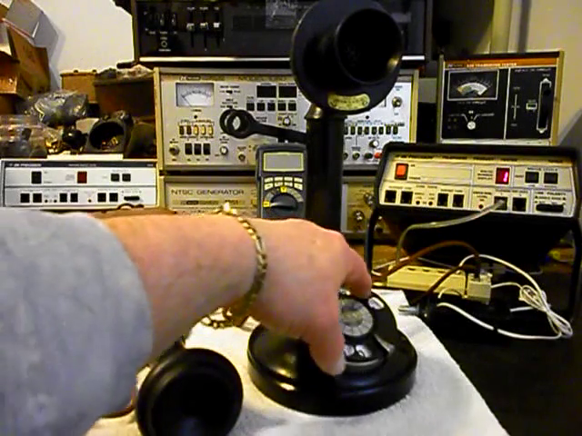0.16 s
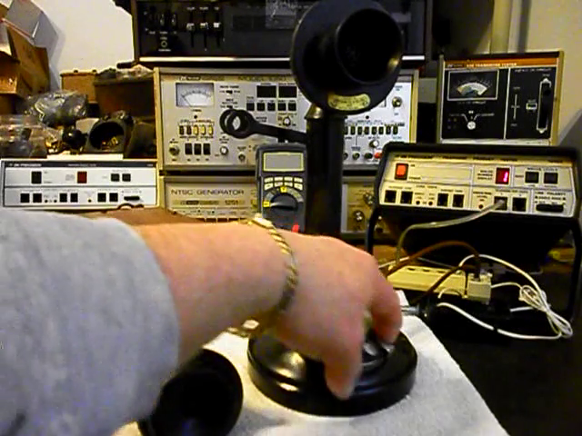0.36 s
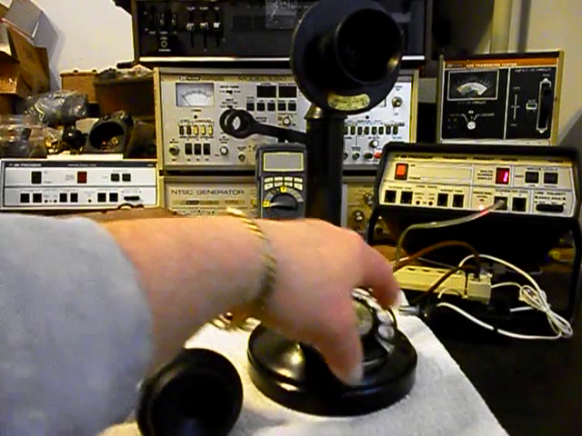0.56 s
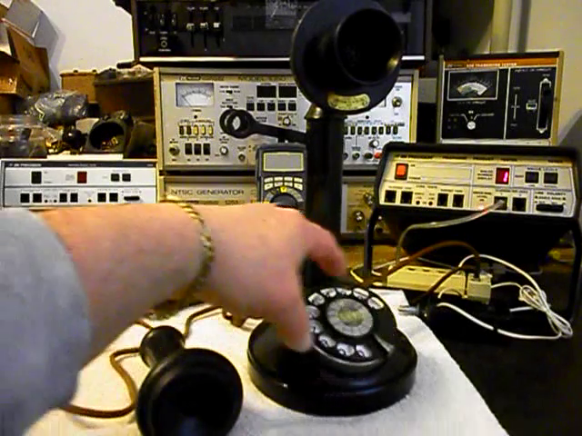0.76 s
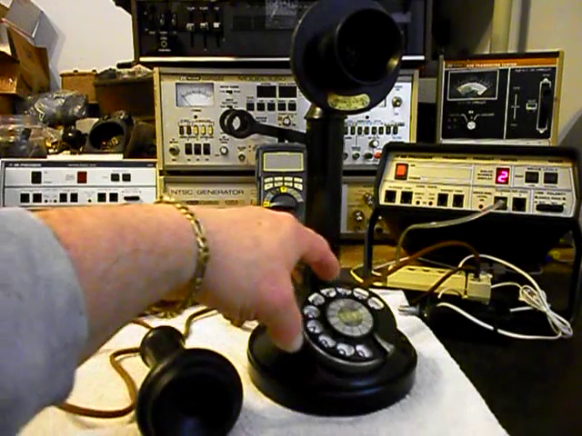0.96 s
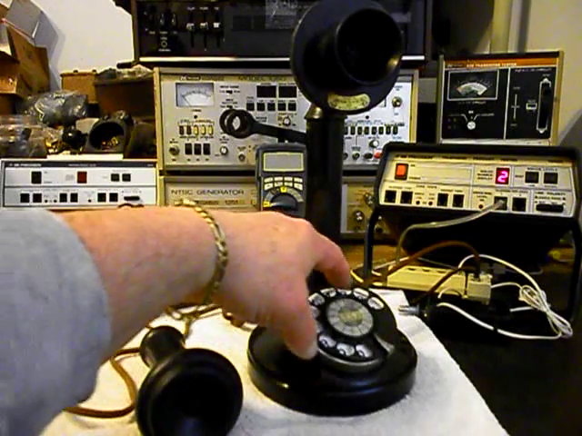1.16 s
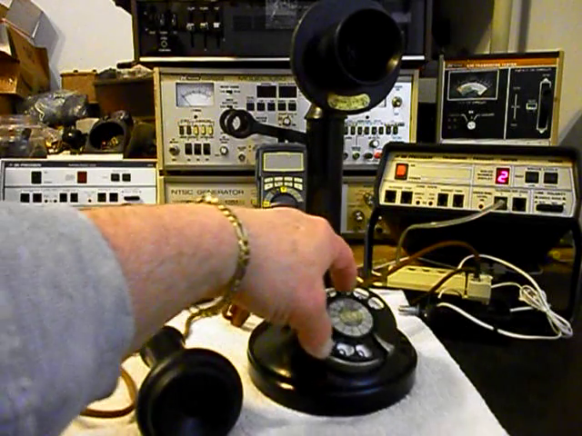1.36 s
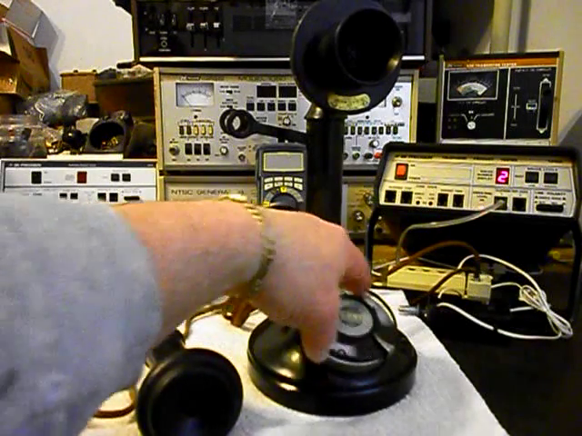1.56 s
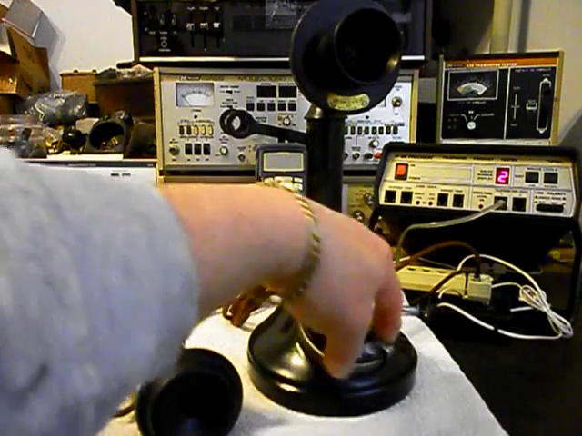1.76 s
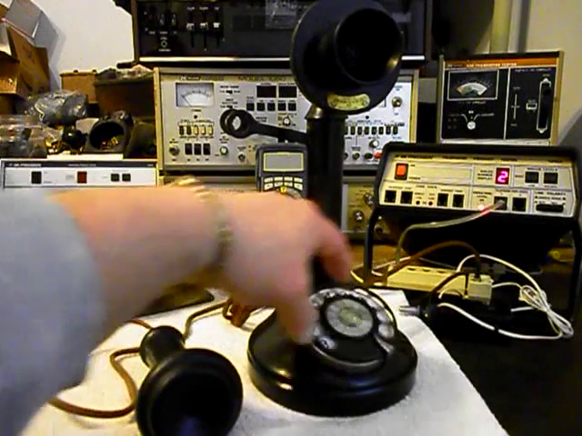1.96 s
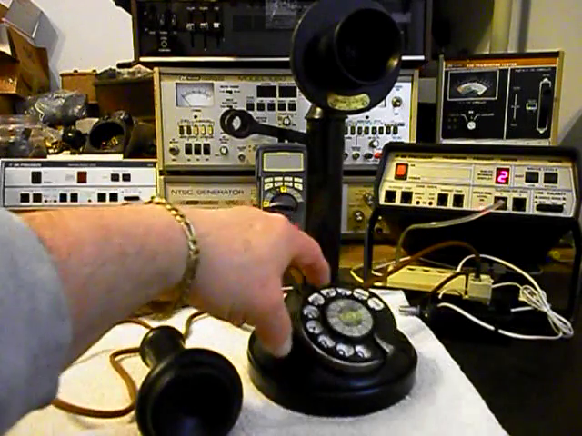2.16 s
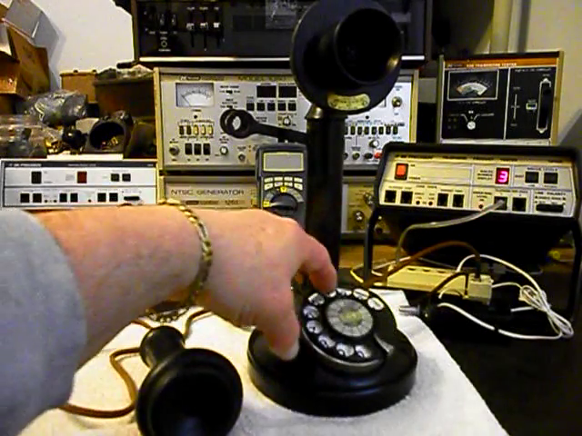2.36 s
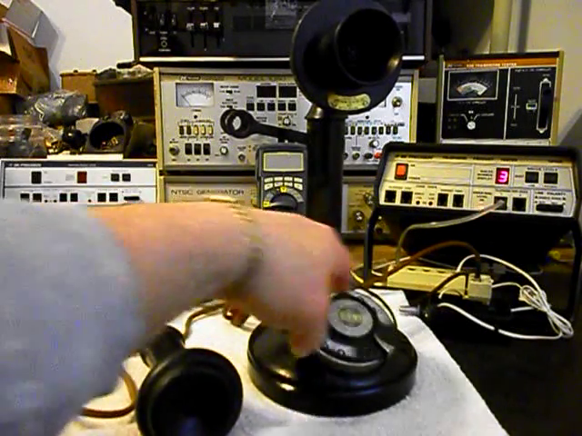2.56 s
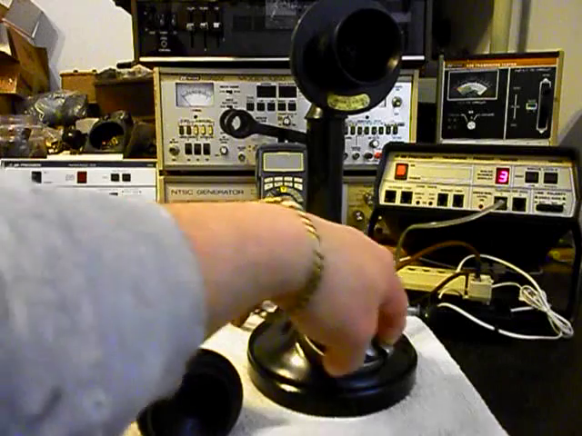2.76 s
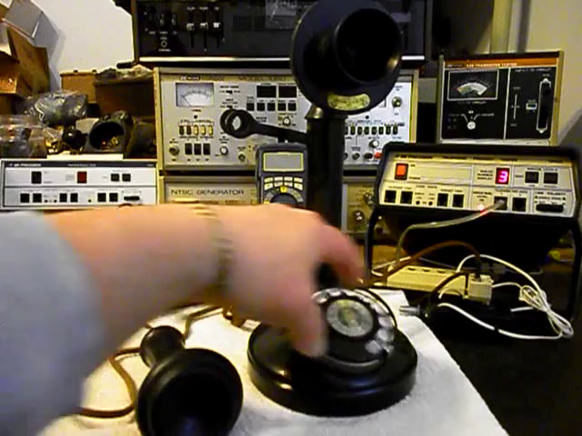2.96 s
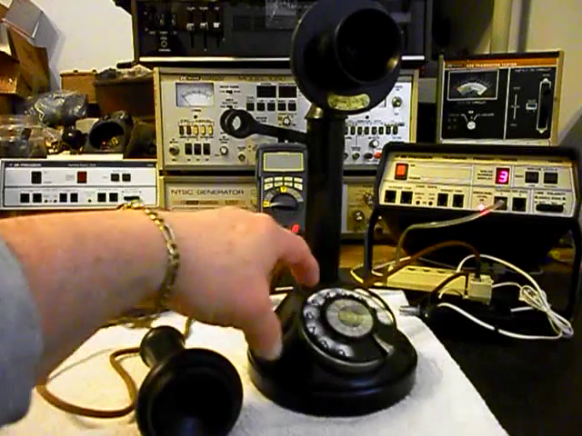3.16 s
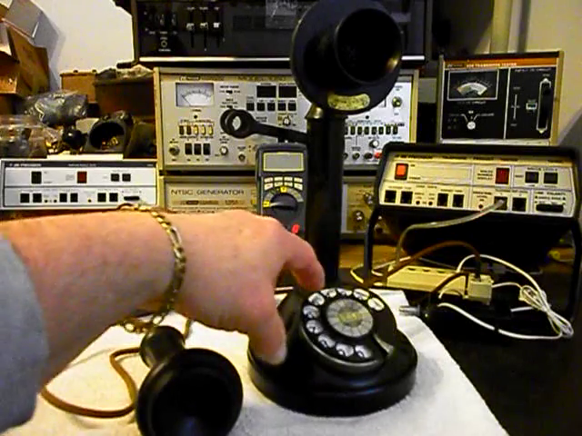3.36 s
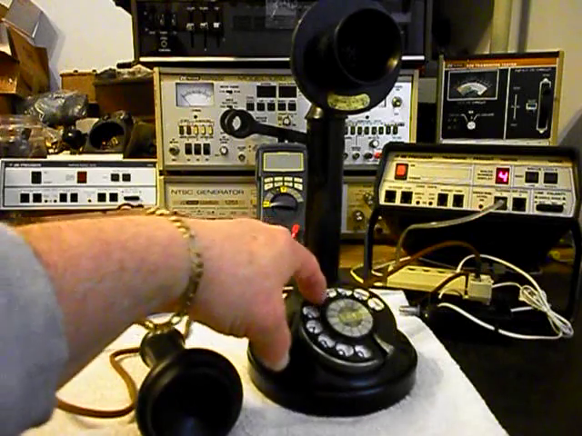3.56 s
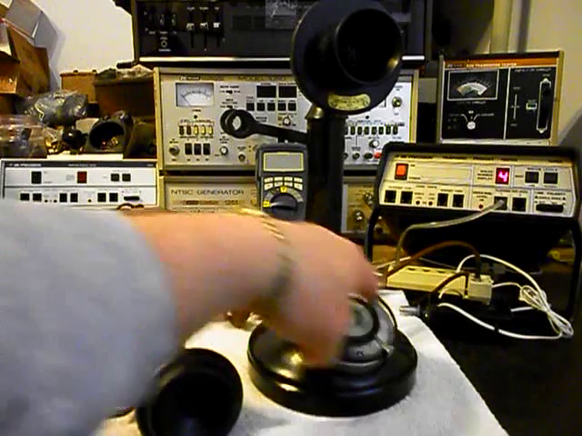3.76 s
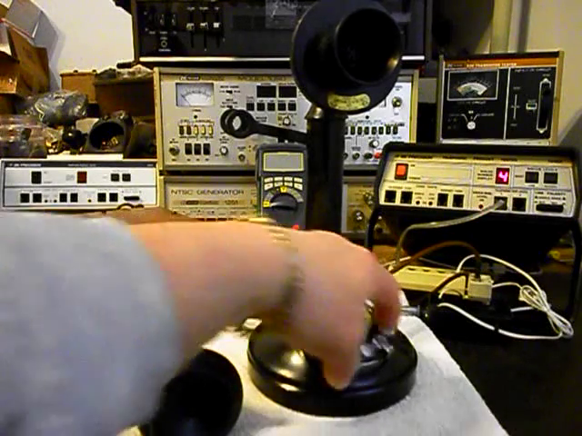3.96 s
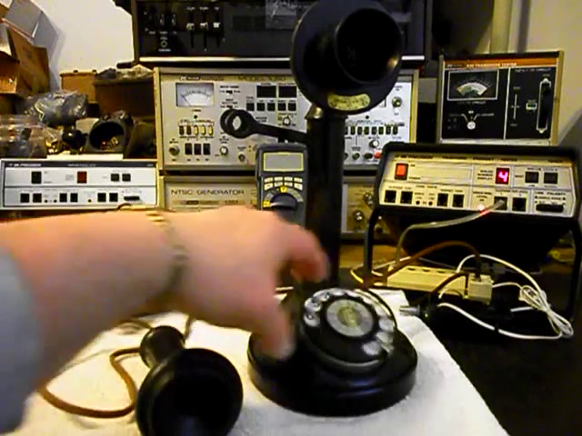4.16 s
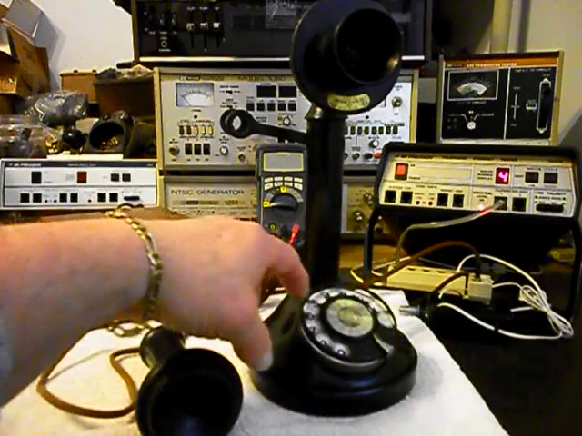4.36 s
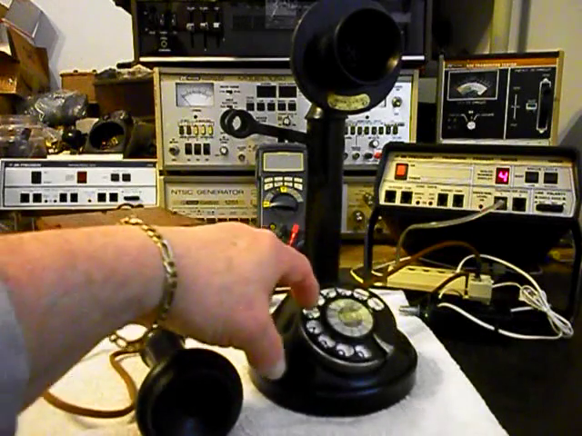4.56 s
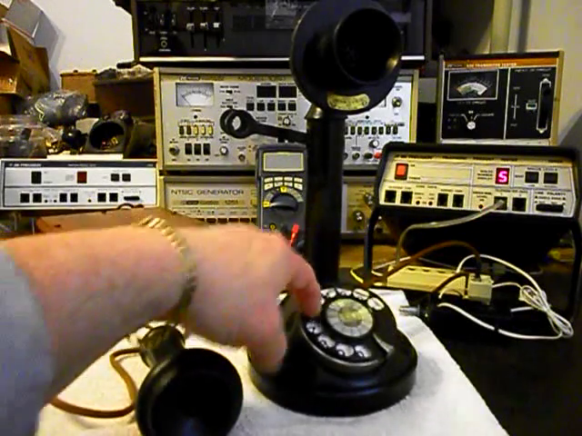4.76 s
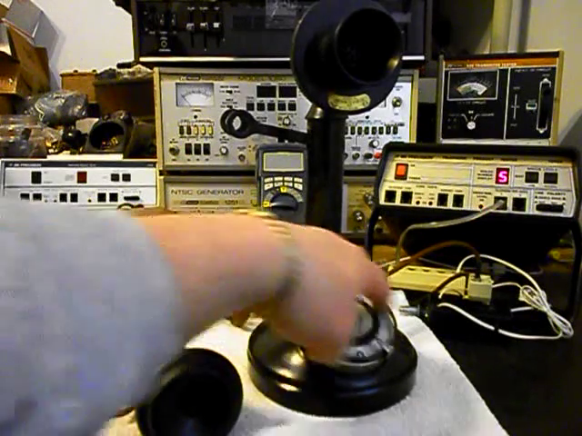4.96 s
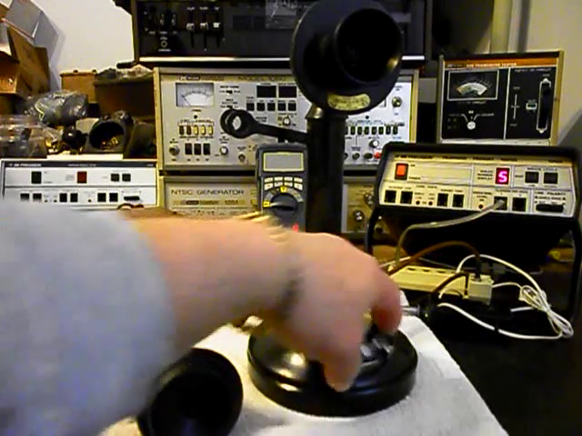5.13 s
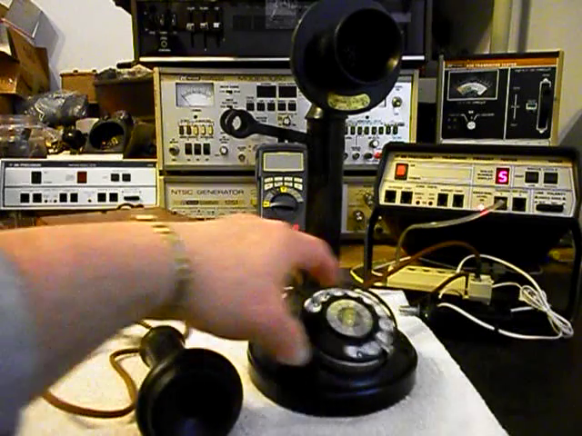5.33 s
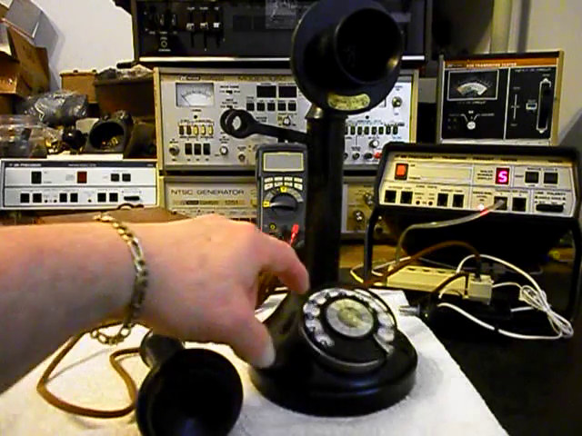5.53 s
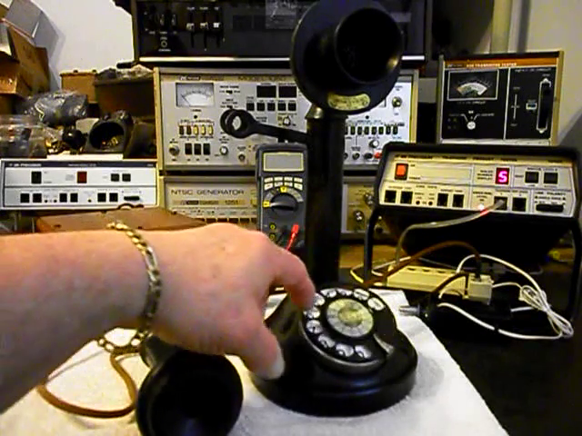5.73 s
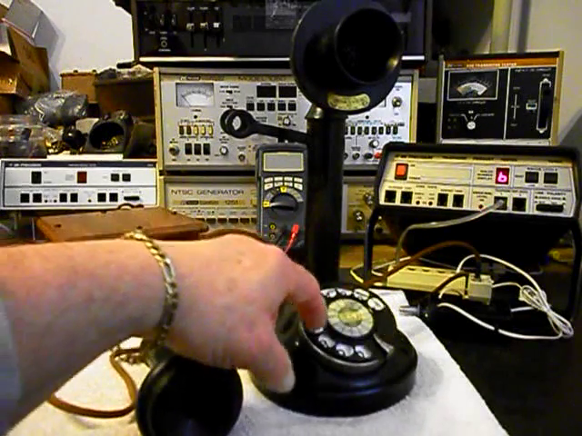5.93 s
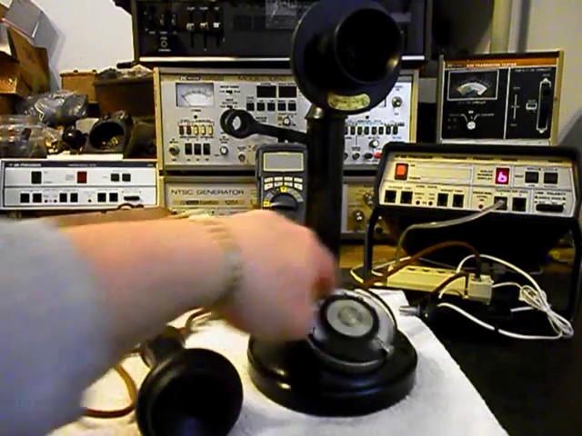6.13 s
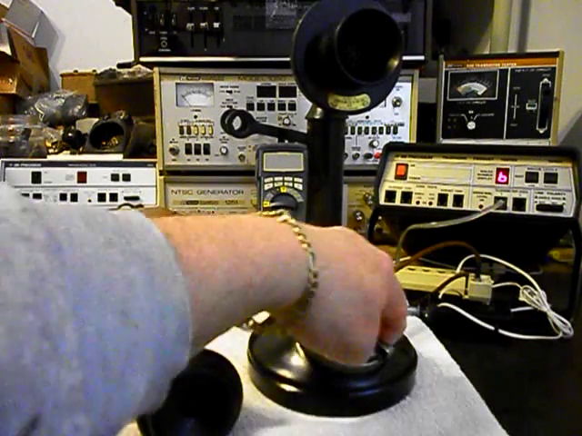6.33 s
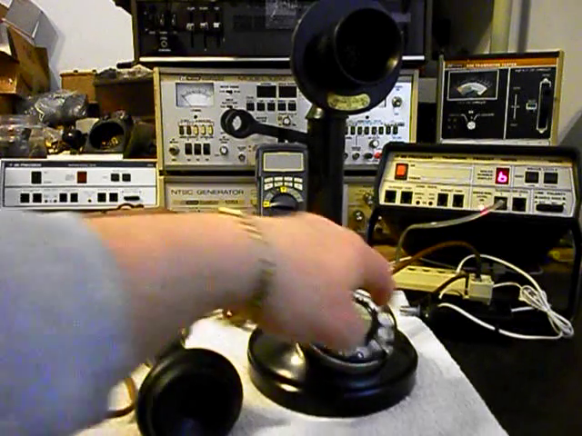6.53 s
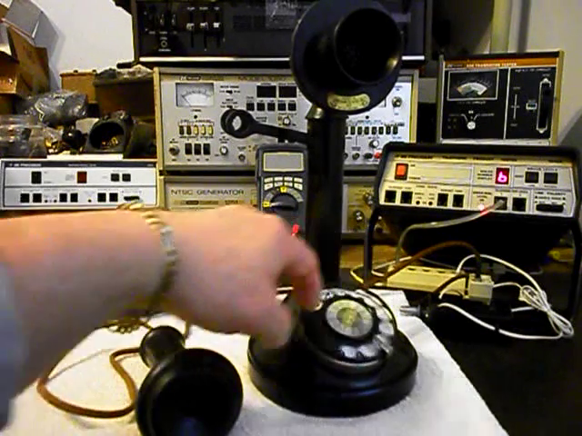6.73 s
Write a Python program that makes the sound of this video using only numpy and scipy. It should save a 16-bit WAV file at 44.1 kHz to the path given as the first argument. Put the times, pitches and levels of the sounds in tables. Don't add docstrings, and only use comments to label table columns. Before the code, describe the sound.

An old rotary telephone dial is wound six times with ratcheting clicks, each release clattering sharply and whirring back to a snappy stop.

```python
import sys
import numpy as np
from scipy import signal
from scipy.fft import rfft, irfft
from scipy.io import wavfile
from scipy.ndimage import uniform_filter1d

SR = 44100
rng = np.random.default_rng(int(sys.argv[2]) if len(sys.argv) > 2 else 0)


def generate_wav(signal):
    frames = np.transpose(np.atleast_2d(signal))
    scaled = np.clip(frames, -1, 1) * 32767
    pcm = np.round(scaled).astype(np.int16)
    wavfile.write(sys.argv[1], SR, pcm)


def invert_db(x):
    u = np.asarray(x, float) / 20
    return 10 ** u


N = 299439

# hz, level_db
AIR_COLOUR = [(12, -48.5), (25, -24.5), (45, -23), (81, -22.5), (109, -8), (144, -4), (175, -5.5),
              (344, -4), (1430, -13.5), (1830, -13.5), (4180, -18.5), (7800, -21.5), (10100, -75.5),
              (17200, -120)]
# hz, t60_s
ROOM_DECAY = [(200, 0.78), (1000, 0.37), (3000, 0.44), (7500, 0.31)]

# start_s, peak_db, pitch_hz, t60_s
KNOCKS = [(0.002, -47.5, 280, 0.047), (0.021, -42.5, 2960, 0.024), (0.21, -45, 1280, 0.035),
          (0.262, -48.5, 3000, 0.04), (0.255, -37.5, 1000, 0.031), (0.345, -27.5, 619, 0.062),
          (1.219, -18, 660, 0.011), (1.224, -46, 1080, 0.062), (1.232, -31.5, 670, 0.034),
          (1.248, -44, 478, 0.059), (1.328, -37, 723, 0.034), (1.452, -38.5, 663, 0.041),
          (2.436, -28.5, 640, 0.023), (2.677, -2.5, 656, 0.011), (3.254, -20.5, 857, 0.029),
          (3.464, -40, 667, 0.03), (3.573, -46.5, 770, 0.046), (3.809, -38.5, 560, 0.11),
          (4.475, -17, 1020, 0.021), (5.011, -24.5, 640, 0.032), (5.965, -27.5, 666, 0.026),
          (6.335, -18.5, 397, 0.028)]
# top_s, level_db, fade_db_per_s
RUBS = [(.16, -61.5, 39), (.23, -55.5, 199), (.35, -41, 299.5), (.455, -48.5, 299), (1.222, -51.5, 154),
        (1.34, -59.5, 63), (1.452, -59.5, 62.5), (2.402, -54.5, 295), (2.44, -56.5, 195),
        (2.522, -51.5, 296.5), (2.708, -38, 92.5), (3.472, -58, 899), (3.582, -56, 63.5), (3.65, -51, 301),
        (4.672, -55.5, 128), (4.797, -54.5, 54), (4.81, -48, 499), (5.015, -40.5, 299), (5.055, -48.5, 71),
        (5.966, -44.5, 450), (6.05, -57.5, 54.5), (6.34, -40.5, 243)]
# top_s, level_db
BENCH_SWAYS = [(.36, -56), (.81, -67), (1.23, -66), (1.78, -57), (1.911, -79.5), (2.191, -67), (2.459, -72),
               (2.7, -55), (2.86, -63), (3.33, -67), (3.48, -76), (3.8, -71.5), (3.95, -63), (4.54, -66),
               (4.73, -76), (5.03, -60.5), (5.24, -64), (5.82, -67.5), (5.98, -64), (6.33, -59.5),
               (6.56, -65), (6.79, -73)]
# start_s, peak_db
AIR_PUSHES = [
    (0.473, -53.5),
    (1.779, -49),
    (3.943, -45),
    (6.477, -56.5),
]
# start_s, length_s, from_hz, to_hz, level_db
SQUEAKS = [(.92, .06, 3100, 3400, -63), (.92, .05, 1550, 1600, -66), (3.618, .042, 3100, 3550, -59),
           (2.712, .042, 165, 172, -32), (2.702, .022, 580, 520, -41), (2.708, .02, 400, 330, -43),
           (2.728, .026, 330, 300, -40), (2.756, .028, 330, 290, -39), (2.722, .05, 720, 640, -39),
           (5.056, .044, 165, 170, -38), (5.046, .022, 520, 420, -47), (5.074, .028, 330, 290, -44),
           (5.104, .026, 290, 340, -43), (5.074, .025, 660, 650, -48), (1.495, .035, 650, 640, -60),
           (2.85, .27, 300, 290, -56), (3.24, .016, 330, 320, -45), (2.1265, .0065, 900, 1080, -21),
           (2.134, .012, 1050, 1150, -33), (5.712, .03, 1940, 2010, -31)]
# pitch_hz, width_hz, level_db
BASE_MODES = [(161, 64, -10), (290, 77, 4.5), (670, 37, -2), (1020, 280, -18)]

WHIR_DB = [-39.5, -38.5, -38, -37.5, -37.5, -38]
# hz, level_db
GEAR_COLOUR = [(59, -60.5), (100, -23), (480, -17), (642, -10.5), (1360, -11.5), (1950, -10), (2470, -13.5),
               (6870, -10.5), (7800, -17), (10100, -59), (17200, -120)]
# hz, level_db
PLATE_COLOUR = [(1000, -22), (1750, 3), (2350, 3.5), (3200, -31)]
# pitch_hz, width_hz, level_db
TRAIN_MODES = [(666, 730, -6), (1050, 300, -6), (2000, 190, 0), (2240, 200, -0.5), (3295, 390, -7.5),
               (5100, 150, -8), (7100, 180, -5)]
# start_s, peak_db
RINGING_TEETH = [(1.924, -33), (1.941, -35), (1.9699, -29), (2.0093, -28.5), (2.0991, -33), (2.1155, -27.5),
                 (2.1205, -32), (2.874, -31), (2.895, -33), (2.921, -36), (2.958, -30), (2.9857, -32),
                 (3.014, -37), (3.045, -36), (3.0707, -29), (3.084, -28), (3.0999, -26.5), (3.1188, -28),
                 (3.2246, -30), (4.0337, -26.5), (4.0811, -31), (4.0991, -40), (4.147, -31), (4.1664, -40),
                 (4.1754, -30), (4.2033, -31), (4.2213, -29), (4.2304, -27), (4.2602, -23.5), (4.2876, -28),
                 (4.3004, -31), (4.3164, -32), (4.336, -31), (4.3454, -29), (5.234, -29.5), (5.3268, -36),
                 (5.3467, -36), (5.3742, -30), (5.4026, -28), (5.43, -27), (5.4595, -26), (5.4736, -30),
                 (5.4864, -33), (5.5059, -22), (5.5174, -34), (5.5448, -28), (5.5638, -32), (5.5724, -30),
                 (5.5992, -27), (5.6191, -28), (6.5768, -33), (6.6129, -29), (6.6508, -28.5), (6.686, -31),
                 (6.7281, -31), (6.754, -35), (6.7635, -27)]
# pitch_hz, width_hz, level_db
PINION_MODES = [(1978, 71, -0.5), (2167, 190, -6.5), (1660, 100, -11.5)]
# start_s, peak_db
TIGHT_TICKS = [(0.022, -54), (1.2174, -43.5), (1.634, -18.5), (1.659, -29), (1.924, -30), (2.0108, -38),
               (2.099, -32), (2.9595, -25), (2.9858, -29), (3.0704, -28), (3.1188, -27), (3.225, -33),
               (4.147, -29), (4.1757, -30), (4.2016, -26.5), (4.2614, -28), (4.287, -26), (4.337, -26),
               (4.9685, -21.5), (5.3762, -27), (5.402, -25), (5.43, -26.5), (5.4577, -31), (5.504, -23),
               (5.5452, -27), (5.487, -33), (5.573, -24.5), (5.632, -33), (5.9646, -37.5), (6.2895, -21),
               (6.65, -27.5), (6.7623, -25.5)]

# start_s, peak_db, treble_db
LEAVE_SNAPS = [(0.293, -28, 0), (0.3053, -19, -14), (1.548, -15.5, -12.5), (1.5613, -16, -9),
               (2.547, -26, -1.5), (2.561, -17.5, -9), (3.6543, -16.5, -11), (3.671, -16, -15),
               (4.811, -17, -8), (4.82, -14, -18), (6.0963, -17.5, -10), (6.104, -16.5, -13)]
# start_s, peak_db, treble_db
HOME_SNAPS = [
    (0.6508, -4, -12.5),
    (2.041, -3, -15.5),
    (3.159, -2, -16),
    (4.377, -1, -14),
    (5.6593, -1.6, -14),
]
LEAVE_PITCH = [0.89, 0.88]
# pitch_hz, width_hz, level_db
SPRING_MODES = [(1617, 983, 12.5), (1930, 440, -1), (2730, 180, -17), (6760, 543, 13)]
# pitch_hz, width_hz, level_db
LEAF_MODES = [(1674, 150, 3), (2075, 970, 4)]

# start_s, peak_db, plate_db
CATCHES = [
    (0.3081, -15, -16),
    (1.5648, -16, -10),
    (2.5653, -15, -16.5),
    (3.6751, -14.5, -10.5),
    (4.8227, -13.5, -25),
    (6.107, -11.5, -18),
]
# start_s, peak_db, plate_db
RATCHETS = [(0.3274, -20, -10), (0.3412, -16.5, -8.5), (1.5947, -17, -9), (1.6184, -17.5, -9),
            (1.644, -16, -10), (2.6101, -18, -10), (2.6382, -18, -9), (2.6534, -16, -9.5),
            (2.6657, -16.5, -11), (3.712, -15, -13), (3.7407, -17.5, -10), (3.7633, -16.5, -12.5),
            (3.7815, -13, -16), (3.802, -17.5, -14.5), (4.8558, -16, -23), (4.888, -16, -19),
            (4.9209, -16.5, -19), (4.9468, -17.5, -29), (4.972, -19.5, -13), (4.999, -19, -15.5),
            (6.131, -17, -18), (6.1654, -13, -20), (6.1985, -14.5, -31), (6.2328, -13.5, -33),
            (6.27, -20.5, -11.5), (6.2958, -17.5, -14.5), (6.32, -18, -11.5)]
PULL_BASE_DB = [-6, -4.5, -4, -6, -6, -5]
PULL_RIM_DB = [-4.5, 0.5, -3, -1.2, 1, 1.5]
PULL_SPREAD_MS = [2.48, 2.5, 2.66, 2.4, 2.44, 2.4]
# hz, level_db
PAWL_COLOUR = [(88, -70), (150, -9.5), (940, -4.5), (1400, -8), (1880, -6.5), (3140, -13.5), (3530, -12.5),
               (7180, -11.5), (7800, -14), (10100, -39.5), (17200, -120)]
# pitch_hz, width_hz, level_db
RATCHET_MODES = [(668, 120, -6), (1030, 96, -3.5), (1633, 84, -5), (1910, 200, -0.5), (3020, 170, -2),
                 (2960, 140, -14.5), (3700, 170, -16), (4260, 180, -10), (4830, 160, -8.5),
                 (5370, 310, -15), (6330, 290, -5.5), (7290, 600, -2)]

# start_s, peak_db, touch_db, spread_ms, base_db
RELEASES = [
    (0.4728, 0, -13, 1.1, -11),
    (1.7778, 2.5, -13, 0.74, -2.5),
    (2.816, 0, -9, 1.53, -2),
    (3.9465, -2.5, -5.5, 2.26, -6),
    (5.1503, -0.5, -15, 1.5, -0.5),
    (6.482, -1.5, -7, 1.47, -1),
]
TOUCH_LEAD_MS = [4.7, 2.3, 2.7, 1.2, 2.2, 2.4]
RELEASE_RIM_DB = [3, -2, -6, 1, -5.5, -0.5]
# start_s, peak_db, plate_db, spread_ms
BOUNCES = [(.492, -8, -3, 4), (0.5048, -15, -7, 3.1), (1.801, -5.5, -10.5, 3.1), (1.816, -13.5, -3.5, 3.2),
           (1.827, -18, -2.5, 4.3), (2.8335, -10, 3, 2.1), (2.846, -12.5, -4, 2.3), (3.964, -7, -9, 2.7),
           (3.976, -12.5, -1, 2.6), (3.986, -19.5, -28, 4.4), (5.164, -10.5, -3, 3),
           (5.173, -14, 9.5, 1.44), (5.18, -25, -15, 2.4), (6.495, -4.5, 3, 1), (6.504, -12, -8, 3.5)]
# start_s, peak_db, plate_db, base_db
ROCKS = [
    (.4754, -9, -4, 1),
    (1.7807, -8.5, 0, 0),
    (2.8185, -11.5, 0, 4),
    (3.9497, -16, 9.5, 8),
    (5.1532, -15, 6, 9.5),
    (6.485, -14.5, 1, 8),
]
# hz, level_db
CLATTER_COLOUR = [(59, -70.5), (100, -33), (642, -8), (1360, -14), (1920, -10.5), (2970, -15.5),
                  (3900, -11), (6990, -17.5), (7800, -18), (10100, -57.5), (17200, -120)]
# pitch_hz, width_hz, level_db
DRIVE_MODES = [(380, 62, -11.5), (640, 240, -12.5), (1000, 120, -13), (1546, 170, -3), (1897, 280, -0.5),
               (2270, 23, -1), (2968, 150, 0.5), (3400, 300, -22.5), (4520, 80, -7.5), (5140, 110, -3.5),
               (5640, 110, -9.5), (6660, 190, 0.5), (6730, 520, -3), (7000, 430, -8.5)]
# start_s, peak_db, plate_db
STOPS = [
    (0.7393, -18.5, -2.5),
    (2.1297, -17.5, -3.5),
    (3.246, -16.5, -2.5),
    (4.467, -16, -1.5),
    (5.7469, -15.5, -3),
]
# pitch_hz, width_hz, level_db
DIAL_MODES = [(663, 24, -4.5), (1032, 240, -8), (1566, 97, 4), (1995, 98, -4), (1866, 23, -4),
              (2245, 36, -11), (2994, 180, 6), (3700, 67, -22), (4980, 770, -8), (5060, 100, -18),
              (6700, 170, 11), (7360, 550, -28)]
# pitch_hz, width_hz, depth_0_1
PLATE_DIPS = [(1356, 170, .7), (1731, 100, 1), (6000, 140, 0.5)]

# pitch_hz, width_hz, depth_0_1
HOUSING_NOTCHES = [(3967, 120, 0.9), (5010, 43, 1)]
# hz, level_db
ANTI_ALIAS = [(7300, 0.5), (7550, -5.5), (7750, -13.5), (7880, -24), (8000, -24.5), (8100, -101)]
# hz, level_db
SMOOTHING = [(7600, 0.5), (8200, -6), (8700, -16.5), (9200, -42), (9800, -56), (15500, -63)]


def evened(x):
    return x / np.sqrt(np.mean(x ** 2) + 1e-20)


def read(points, hz):
    f, value = np.transpose(points)
    return np.interp(np.log(hz + 1), np.log(f + 1), value)


def add(mix, start_s, sound):
    part = mix[round(start_s * SR):][:len(sound)]
    part += sound[:len(part)]


def level(tables):
    t, gain = np.arange(N) / SR, np.zeros(N)
    for rows in tables:
        s, db = np.transpose(rows)
        gain += invert_db(np.interp(t, s, db)) * (t >= s[0]) * (t < s[-1])
    return uniform_filter1d(gain, size=400)


def swells(rows, rise_db_per_s):
    t, gain = np.arange(0, N, 64) / SR, 0
    for top_s, db, fade_db_per_s in rows:
        fall_db = np.where(t < top_s, rise_db_per_s * (top_s - t), fade_db_per_s * (t - top_s))
        gain = gain + invert_db(db - fall_db)
    return np.interp(np.arange(N) / SR, t, gain)


def shaped(x, points):
    x = np.pad(x, 2048, "reflect")
    gain = invert_db(read(points, np.fft.rfftfreq(len(x), 1 / SR)))
    return irfft(rfft(x) * gain, len(x))[2048:-2048]


def notched(x, notches):
    for hz, width_hz, depth in notches:
        x = x - depth * signal.lfilter(*signal.iirpeak(hz, hz / width_hz, SR), x)
    return x


def body(broad, modes, ring_db, size=4096):
    hz = abs(np.fft.fftfreq(size, 1 / SR))
    lift = sum(invert_db(db + ring_db) ** 2 / (1 + (2 * (hz - f) / width_hz) ** 2) for f, width_hz, db in modes)
    log_gain = np.log(invert_db(read(broad, hz)) * np.sqrt(1 + lift) + 1e-5)
    taps = np.fft.ifft(np.exp(np.conj(signal.hilbert(log_gain)))).real[:size // 2]
    return taps / np.linalg.norm(taps)


def air():
    return invert_db(-60.5) * evened(shaped(rng.standard_normal(N), AIR_COLOUR))


def room(x, count=3):
    out, turn = np.zeros(N), 2 * np.pi * 7.3 * np.arange(N) / SR
    for k in range(count):
        taps, at = np.zeros(SR // 2), np.arange(200, SR // 2 - 20, 20)
        taps[at + rng.integers(0, 20, len(at))] = rng.choice([-1., 1.], len(at))
        hz, t, z = signal.stft(taps, SR, nperseg=256)
        decay = invert_db(-60 * t / read(ROOM_DECAY, hz)[:, None])
        tail = signal.istft(z * decay, SR, nperseg=256)[1]
        share = np.sqrt(2 / count) * np.cos(turn / 2 + np.pi * k / count)
        out += signal.oaconvolve(x * share, tail / np.linalg.norm(tail))[:N]
    return out


def bench():
    sway = shaped(rng.standard_normal(N), [(45, -40.5), (70, 2.0), (90, -3.5), (125, -24.0), (300, -84.5)])
    sway = sway / uniform_filter1d(sway ** 2, size=1200) ** 0.36
    fade_db_per_s, rest_db = 137.5, -91
    gain = invert_db(rest_db) + swells([(s, db, fade_db_per_s) for s, db in BENCH_SWAYS], rise_db_per_s=226)
    return gain * evened(sway)


def rubbing():
    colour = [(80, -17.0), (150, -9.0), (900, 1.5), (2000, -10.0), (3300, -10.5), (4200, -25)]
    skin = rng.standard_normal(N) * invert_db(60 * uniform_filter1d(rng.standard_normal(N), size=400))
    rub = signal.oaconvolve(evened(skin), body(colour, BASE_MODES, ring_db=10.0))[:N]
    return swells(RUBS, rise_db_per_s=2500) * rub


def knocks():
    t, out = np.arange(6000) / SR, np.zeros(N)
    for s, db, hz, t60_s in KNOCKS:
        ring = np.sin(2 * np.pi * hz * t) + 0.5 * np.sin(2 * np.pi * 1.2 * hz * t)
        add(out, s, invert_db(db + 3.5 - 60 * t / t60_s) * ring * (1 - np.exp(-t / 0.0077)))
    for s, db in AIR_PUSHES:
        add(out, s, invert_db(db - 3.5) * (t / 0.008) * np.exp(1 - t / 0.005))
        add(out, s, invert_db(db + 15.5) * np.exp(-t / 0.0027) * np.sin(2 * np.pi * 160 * t))
    return out


def squeaks():
    out = np.zeros(N)
    for s, length_s, from_hz, to_hz, db in SQUEAKS:
        u = np.linspace(0, 1, round(length_s * SR))
        hz = from_hz + (to_hz - from_hz) * np.sin(np.pi / 2 * u)
        add(out, s, invert_db(db) * np.sin(np.pi * u ** 0.69) * np.sin(2 * np.pi * np.cumsum(hz) / SR))
    return out * invert_db(22 * uniform_filter1d(rng.standard_normal(N), size=150))


def returns():
    set_off_s, set_off_db, run_up_s, unload_s = 0.014, -4.5, 0.22, 0.055
    end, tables = [(N / SR + 1, 0)], []
    for release, snap, stop, db in zip(RELEASES, HOME_SNAPS + end, STOPS + end, WHIR_DB):
        s, snap_s, rest_s = release[0], snap[0], stop[0]
        full_s = max(min(s + set_off_s + run_up_s, snap_s - unload_s), s + 2 * set_off_s)
        tables.append([(s + set_off_s, db + set_off_db), (full_s, db), (max(snap_s - unload_s, full_s), db),
                       (snap_s, db), (rest_s, db)])
    return level(tables)


def whir():
    turns = np.cumsum(88 * (1 + 2.3 * uniform_filter1d(rng.standard_normal(N), size=2000))) / SR
    size = invert_db(1.2 * rng.standard_normal(N))[turns.astype(int)]
    pulses = size * np.exp(3 * (np.cos(2 * np.pi * (turns - .5)) - 1))
    drag = evened((2.2 + pulses) * rng.standard_normal(N))
    drag = signal.oaconvolve(drag, body(GEAR_COLOUR, TRAIN_MODES, ring_db=8.5))
    mesh = evened(pulses * rng.standard_normal(N))
    mesh = signal.oaconvolve(mesh, body(PLATE_COLOUR, TRAIN_MODES, ring_db=17.5))
    return returns() * (invert_db(-3.0) * drag + invert_db(-10.5) * mesh)[:N]


def teeth():
    t, out, rise_ms = np.arange(900) / SR, np.zeros(N), 1.25
    onset = 1 - np.exp(-(t * 1000 / rise_ms) ** 2)
    for s, db in RINGING_TEETH:
        phases = rng.random(len(PINION_MODES))
        ring = sum(invert_db(m_db) * np.exp(-np.pi * width_hz * t) * np.sin(2 * np.pi * (f * t + p))
                   for (f, width_hz, m_db), p in zip(PINION_MODES, phases))
        add(out, s, invert_db(db + 0.5) * ring * onset)
    return out


def snaps():
    t, out = np.arange(1200) / SR, np.zeros(N)
    leaves = sum(invert_db(db) * np.exp(-np.pi * width_hz * t) * np.sin(2 * np.pi * f * t)
                 for f, width_hz, db in LEAF_MODES)
    onset = 1.034 * (1 - np.exp(-(t / 0.0005) ** 2))
    treble_onset = 1 - np.exp(-(t / .0004) ** 2)
    events = [(*row, LEAVE_PITCH[k % 2], 1) for k, row in enumerate(LEAVE_SNAPS)]
    events += [(*row, 1, 1) for row in HOME_SNAPS]
    events += [(s + .0312, db - 2, treble_db + 2, 1, -1) for s, db, treble_db in HOME_SNAPS]
    for s, db, treble_db, pitch, sign in events:
        rings = [invert_db(m_db) * np.exp(-np.pi * width_hz * t) * np.sin(2 * np.pi * f * (pitch if f < 4000 else 1) * t)
                 for f, width_hz, m_db in SPRING_MODES]
        snap = sign * (sum(rings[:-1]) + invert_db(treble_db) * rings[-1] * treble_onset) * onset
        add(out, s, invert_db(db) * snap)
        add(out, s + 0.002973, invert_db(db - 12.0) * uniform_filter1d(snap, size=6))
        add(out, s + 0.002523, sign * invert_db(db - 18.5) * leaves * onset)
    out = signal.lfilter(*signal.butter(2, 400, "high", fs=SR), out)
    thud_hz, thud_db, thud_s = 315, -35.5, 0.0025
    thud = t / thud_s * np.exp(1 - t / thud_s) * np.sin(2 * np.pi * thud_hz * t)
    for s, db, _ in HOME_SNAPS:
        add(out, s, invert_db(db + thud_db) * thud)
    return out


def rattles(rows, broad, modes, ring_db, rise_ms, lag_ms, same, strike_db):
    t, out = np.arange(2000) / SR * 1000, np.zeros(N)
    detune, uneven_db = .02, 1.5
    habit = rng.standard_normal((6, len(t)))
    rises_ms = [rise_ms, rise_ms, 0.69 * lag_ms, lag_ms, 1.1 * lag_ms, 1.17 * lag_ms]
    rise = 1 - np.exp(-t / np.array(rises_ms)[:, None])
    stretch = np.array([.95, 1.05, 1.15, 1.3, 1.3, 1.35])[:, None]
    bands = [(5700, "high"), ((3500, 5700), "band"), ((2550, 3500), "band"), ((1300, 2550), "band"),
             ((820, 1300), "band"), ((280, 820), "band"), (2400, "high")]
    filters = [signal.butter(2, hz, kind, fs=SR) for hz, kind in bands]
    for s, db, plate_db, base_db, spread_ms, rim_db in rows:
        grit = same * habit + np.sqrt(1 - same ** 2) * rng.standard_normal((6, len(t)))
        shade = rng.standard_normal((len(modes), 2))
        shaded = [(f * (1 + detune * a), width_hz, m_db + uneven_db * b)
                  for (f, width_hz, m_db), (a, b) in zip(modes, shade)]
        taps = body(broad, shaded, ring_db)
        parts = np.array([signal.lfilter(*f, taps) for f in filters])
        shape = rise * np.exp(-t / spread_ms / stretch)
        rung = signal.fftconvolve(grit * shape, parts[:-1], axes=1)
        energy = np.linalg.norm(shape, axis=1) * np.linalg.norm(parts[:-1], axis=1)
        rung *= (energy / np.linalg.norm(rung, axis=1))[:, None]
        shares_db = np.array([0, 0, plate_db + rim_db, plate_db, base_db, base_db])
        add(out, s, invert_db(db + shares_db) @ rung)
        add(out, s, invert_db(db + strike_db) * parts[-1])
    return notched(out, PLATE_DIPS)


def tight_teeth():
    rows = [(s, db, -3, 0, 4.6, -1.5) for s, db in TIGHT_TICKS]
    return invert_db(-5) * rattles(rows, GEAR_COLOUR, TRAIN_MODES, ring_db=5, rise_ms=1.0, lag_ms=0.9,
                             same=.3, strike_db=-0.5)


def stops():
    rows = [(s, db, plate_db, -4, 4.74, -2.5) for s, db, plate_db in STOPS]
    return invert_db(-0.5) * rattles(rows, GEAR_COLOUR, DIAL_MODES, ring_db=-1.0, rise_ms=0.93, lag_ms=0.43,
                               same=0.41, strike_db=-5.0)


def pawl():
    lag_s, plate_grip, plate_even_db, spread_ms_per_db = .0006, 1.3, -11, -0.0827
    drops = sorted(CATCHES + RATCHETS)
    pulls = np.cumsum([row in CATCHES for row in drops]) - 1
    rows = [(s + lag_s, db - 2.5, plate_grip * (plate_db - plate_even_db), PULL_BASE_DB[k],
             PULL_SPREAD_MS[k] + spread_ms_per_db * (db + 13.0), PULL_RIM_DB[k])
            for (s, db, plate_db), k in zip(drops, pulls)]
    return invert_db(3.2) * rattles(rows, PAWL_COLOUR, RATCHET_MODES, ring_db=14.0, rise_ms=0.04, lag_ms=1.48,
                              same=0.2, strike_db=10.0)


def clatter():
    rows = [(s, db, plate_db, -2, ms, -.5) for s, db, plate_db, ms in BOUNCES]
    for (s, db, touch_db, ms, base_db), lead_ms, rim_db in zip(RELEASES, TOUCH_LEAD_MS, RELEASE_RIM_DB):
        rows.append((s - lead_ms / 1000, touch_db, 5, 9, 1.27, rim_db))
        rows.append((s, db, -1, base_db, ms, rim_db))
    rows += [(*row, 1.81, rim_db) for row, rim_db in zip(ROCKS, RELEASE_RIM_DB)]
    return invert_db(-1.5) * rattles(sorted(rows), CLATTER_COLOUR, DRIVE_MODES, ring_db=17, rise_ms=0.12,
                               lag_ms=0.68, same=0.31, strike_db=11.5)


def scene():
    fingers = bench() + rubbing() + knocks() + squeaks()
    springs = snaps()
    dial = whir() + teeth() + tight_teeth() + stops() + pawl() + clatter()
    wet = room(invert_db(-9.5) * dial + invert_db(-14.0) * springs + invert_db(-15.5) * fingers)
    return (dial + springs + fingers + wet + air())[None]


def band_limit(x):
    return signal.sosfilt(signal.butter(12, 15780, fs=SR, output="sos"), x)


def record(dry):
    converter_hz = 16000
    held = dry[0] / (1 + abs(dry[0] / .8) ** 6) ** (1 / 6)
    band = notched(shaped(held, ANTI_ALIAS), HOUSING_NOTCHES)
    mirror = 2 * band * np.cos(2 * np.pi * converter_hz * np.arange(N) / SR)
    smooth = shaped(band + mirror, SMOOTHING + [(16000, -100)])
    add(smooth, 5.16846, invert_db(-18) * np.ones(1))
    return band_limit(smooth[None])


dry = scene()
out = record(dry)
generate_wav(out)
```